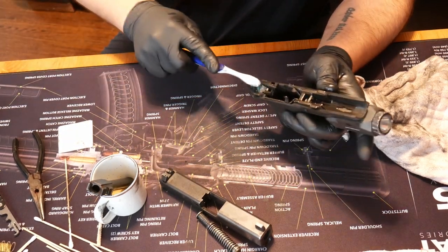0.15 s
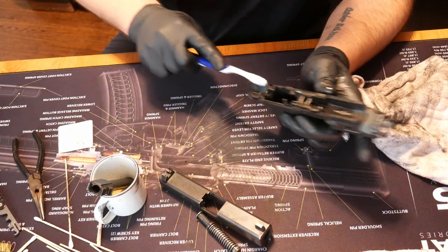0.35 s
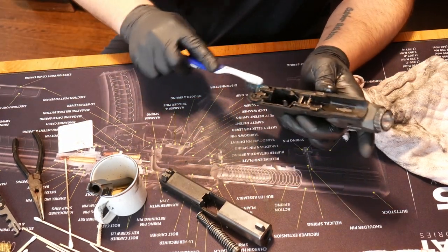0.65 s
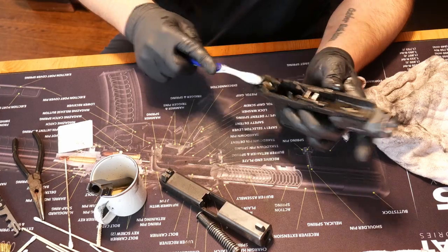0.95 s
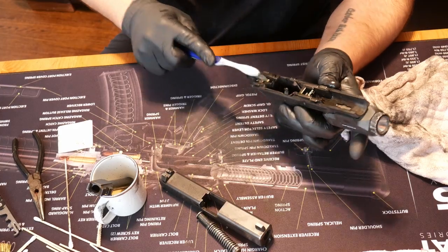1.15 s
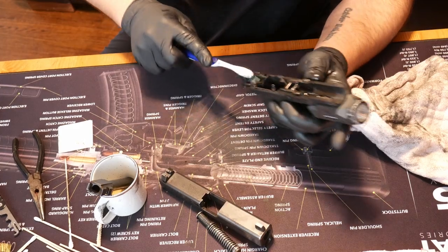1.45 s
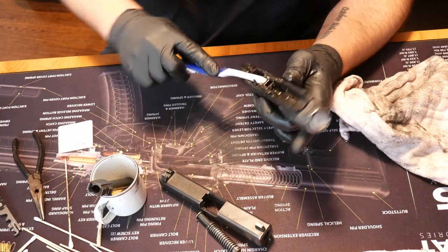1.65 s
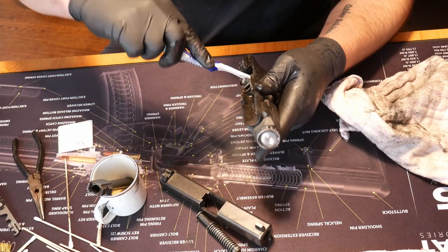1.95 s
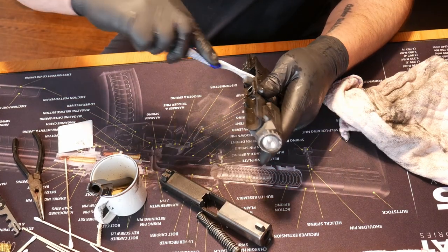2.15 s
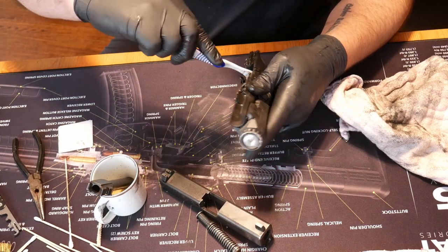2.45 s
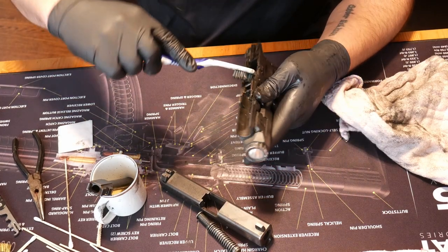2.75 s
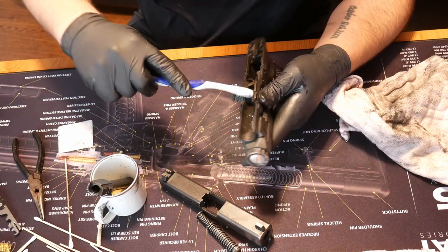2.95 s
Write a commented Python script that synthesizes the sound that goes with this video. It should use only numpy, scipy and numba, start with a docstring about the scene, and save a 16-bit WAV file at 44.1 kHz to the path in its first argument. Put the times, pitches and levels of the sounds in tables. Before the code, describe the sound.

Close, scratchy toothbrush strokes run over a wet pistol frame at a bench in a small room. A cluster of ringing knocks follows, then softer scrubbing and one sharp, bright metal snap, over a faint hum.

```python
"""A toothbrush scrubs a wet pistol frame, about eight strokes a second, over a bench in a small room.
Bristles flick off the edges, hissing and ringing the hollow frame. The frame knocks as it is turned
in the hand, then a metal part snaps sharply. The snap overloads the input: a limiter ducks and lets
the room's ring swell back. Underneath sit room tone, a wavering hum and soft thuds of hands on the bench."""
import sys
import numpy as np
from scipy import signal
from scipy.fft import rfft, irfft, next_fast_len
from scipy.io import wavfile
from scipy.ndimage import uniform_filter1d
from numba import njit

SR = 44100
rng = np.random.default_rng(int(sys.argv[2]) if len(sys.argv) > 2 else 0)


def master_out(mix):
    """Clip the mix to full scale and print it as 16-bit PCM to the path in sys.argv[1]."""
    frames = np.transpose(np.atleast_2d(mix))
    ceiling = np.clip(frames, -1, 1)
    pcm = np.round(ceiling * 32767).astype(np.int16)
    wavfile.write(sys.argv[1], SR, pcm)


N = 136710
TIME = np.arange(N) / SR
HIT_GAIN = np.sqrt(.005 * SR)  # gives a hit of energy 1 the energy of 5 ms at rms 1


def undb(db):
    """Decibels to gain."""
    return 10 ** (np.asarray(db) / 20)


def unit_rms(x):
    """Scale to rms 1."""
    return x / np.sqrt(np.mean(x ** 2))


def unit_energy(x):
    """Scale to energy 1."""
    return x / np.sqrt(np.sum(x ** 2))


def on_log(hz, points):
    """Read a curve on a log-frequency axis."""
    freqs, values = np.array(points, float).T
    return np.interp(np.log(np.maximum(hz, 1)), np.log(freqs), values)


def colour(x, eq):
    """Minimum-phase EQ: nothing rings ahead of a transient."""
    n = 2 * next_fast_len(len(x))
    cepstrum = irfft(on_log(np.fft.rfftfreq(n, 1 / SR), eq) * np.log(10) / 20)
    cepstrum[1:n // 2] *= 2
    cepstrum[n // 2 + 1:] = 0
    return irfft(rfft(x, n) * np.exp(rfft(cepstrum)))[:len(x)]


def noise(eq):
    """Steady coloured noise of rms 1."""
    return unit_rms(colour(rng.standard_normal(N), eq))


def wander(per_s):
    """Smooth random drift of rms 1."""
    hold = max(int(SR / per_s), 1)
    steps = np.repeat(rng.standard_normal(N)[:N // hold + 1], hold)
    return unit_rms(uniform_filter1d(steps, hold)[:N])


def add(out, at, x):
    """Mix a sound in at a time in seconds."""
    i = int(at * SR)
    out[i:i + len(x)] += x[:N - i]


# Room tone common to both channels (frequency [Hz], level [dB])
TONE_MID_EQ = [(25, -24), (60, -2), (130, -1.5), (300, -1), (600, -4.5), (1200, -6.5), (3000, -14.5),
               (7000, -17), (15500, -21.5)]
# Room tone opposed between the channels, for width (frequency [Hz], level [dB])
TONE_SIDE_EQ = [(25, -15), (45, 4), (65, 6), (85, 11), (105, 2), (135, 5), (190, -11.5), (400, -7),
                (1200, -11.5), (3000, -14.5), (15500, -17)]


def room_tone(hum_hz=86, waver_db=12):
    """A steady bed of air, with a wavering hum opposed between left and right."""
    mid = undb(-47.5) * noise(TONE_MID_EQ)
    side = undb(-43.5) * noise(TONE_SIDE_EQ)
    hum = np.sin(2 * np.pi * hum_hz * TIME + .5 * wander(6.4))
    side += undb(-48.5) * unit_rms(hum * undb(waver_db * wander(12)))
    return np.array([mid + side, mid - undb(-1.5) * side])


# Cues for the bench thuds (time [s], half-width [s], level [dB])
THUD_CUES = [(0.405, 0.058, -43.5), (0.535, 0.031, -47.5), (0.664, 0.042, -46.5), (0.854, 0.053, -51.5),
             (1.057, 0.076, -48), (1.392, 0.11, -49.5), (1.59, 0.028, -57), (1.694, 0.052, -47),
             (1.848, 0.069, -56)]
# Their dull, bassy tone (frequency [Hz], level [dB])
THUD_EQ = [(30, -16), (60, -10), (88, 2.5), (135, -4.5), (190, -14.5), (300, -9), (500, -23), (1200, -42)]


def bench_thuds(side_db=4.5):
    """Hands and forearms bump the bench: soft, wide swells of low noise."""
    envelope = sum(undb(db) * np.exp(-((TIME - at) / width) ** 2) for at, width, db in THUD_CUES)
    mid, side = noise(THUD_EQ), undb(side_db) * noise(THUD_EQ)
    return envelope * np.array([mid + side, mid - side]) / np.sqrt(2)


# Reverb time of the small room (frequency [Hz], t60 [s])
REVERB_DECAY = [(200, 0.18), (1500, 0.54), (3500, 0.62), (6000, 0.47), (10000, 0.31), (15000, 0.22)]


def reverb(send, build_s=.0013):
    """One channel of diffuse reflections; the upper mids outlast the bass and the top."""
    t = np.arange(SR) / SR
    hz, spectrum = np.fft.rfftfreq(SR, 1 / SR), rfft(rng.standard_normal(SR))
    tail = 0
    for band, t60 in REVERB_DECAY:
        share = on_log(hz, [(f, f == band) for f, _ in REVERB_DECAY])
        tail += irfft(spectrum * share, SR) * np.exp(-np.log(1000) * t / t60)
    tail *= 1 - np.exp(-t / build_s)
    return signal.fftconvolve(send, unit_energy(tail))[:N]


def transient(decay_s, eq, rise_s=.00064):
    """The crack of a hard contact: a noise burst of energy 1."""
    t = np.arange(SR // 8) / SR
    envelope = np.exp(-t / decay_s) * (1 - np.exp(-t / rise_s))
    burst = rng.standard_normal(len(t)) * envelope
    for _ in range(6):  # flatten the spectrum, then restore the envelope
        burst = irfft(np.exp(1j * np.angle(rfft(burst))), len(t))
        local_rms = np.sqrt(np.abs(uniform_filter1d(burst ** 2, size=24)) + 1e-12)
        burst *= envelope / local_rms
    return unit_energy(colour(burst, eq))


# Bright, metallic tone of the snap (frequency [Hz], level [dB])
SNAP_EQ = [(100, -10), (500, -10.5), (1000, -17), (1600, -8.5), (2600, -8.5), (3650, 1), (4400, -3.5),
           (6400, 0.5), (7800, -3), (11000, -1), (15500, -14.5)]
# Early reflections off the bench and nearby things (delay [s], level [dB])
SNAP_ECHOES = [(.005, -18), (.011, -31)]


def snap(at=2.6035, level_db=8.5):
    """A metal part strikes home, far louder than all else; nearby surfaces throw it back."""
    out = np.zeros(N)
    crack = undb(level_db) * HIT_GAIN * transient(decay_s=.00084, eq=SNAP_EQ)
    add(out, at, crack)
    for delay, db in SNAP_ECHOES:
        add(out, at + delay, undb(db) * crack)
    return out


def partial(hz, t60, detune_span=.025, scatter_db=3):
    """One fading mode of the frame; grip and point of contact vary its pitch and strength."""
    t = np.arange(SR // 8) / SR
    detune, strength = rng.uniform(-1.11, 1, 2)
    wave = np.sin(2 * np.pi * (hz * (1 + detune_span * detune) * t + rng.random()))
    return undb(scatter_db * strength) * unit_energy(wave * np.exp(-np.log(1000) * t / t60))


# Modes of the hand-held frame (frequency [Hz], brushed level [dB], knocked level [dB], knocked t60 [s])
FRAME_MODES = [(1470, -4.5, -6.5, 0.023), (1601, -10, -6.5, 0.038), (1904, -5.5, -8.5, .025),
               (2660, -31.5, -16, 0.0041), (2997, -12.5, -5.5, 0.033), (3170, -8, -7, 0.06),
               (3460, -0.5, -3.5, 0.02), (3680, -1, -3.5, 0.019), (4720, -12, -10.5, 0.0077),
               (6300, -4, -18, 0.0036)]


def knocked_ring(low_db, low_below_hz=2400):
    """The hollow frame rings after a blow; low_db weights its low modes."""
    return sum(undb(db + low_db * (hz < low_below_hz)) * partial(hz, t60)
               for hz, _, db, t60 in FRAME_MODES)


def brushed_ring(t60_share=.43):
    """The frame's ring after one flick, damped by the bristles pressed on it."""
    return unit_energy(sum(undb(db) * partial(hz, t60 * t60_share) for hz, db, _, t60 in FRAME_MODES))


# Cues for the knocks (time [s], level [dB], low-mode trim [dB], crack and scuff trim [dB])
KNOCK_CUES = [(0.015, -33, -18, -1), (0.029, -35, -9, -18), (0.108, -34, -1, -6), (.252, -30, -1, -11),
              (.294, -29, -19, 0.5), (.526, -30, -17, -5), (1.04, -30.5, -19, -13), (1.145, -35.5, -23, -3),
              (1.307, -27.5, -20, -11), (1.324, -31, 3, -8), (1.394, -27.5, 3.5, -7),
              (1.441, -26, -25, -12), (1.536, -16.5, -7.5, -10.5), (1.545, -24, -5.5, -17),
              (1.572, -18.5, -3.5, -2), (1.5784, -21.5, 0, -8), (1.583, -27, 2, -19), (1.619, -31, 6, -5),
              (1.678, -22, 6, 2.5), (1.7, -22, 1.5, 0.5), (1.82, -29.5, 5.5, -7.5), (1.975, -31, 0.5, -5),
              (2.193, -38, 6, -9), (2.311, -25.5, 1, -5), (2.42, -24.5, 1.5, -12.5), (2.438, -25.5, 2, -14),
              (2.444, -28, 10.5, 3.5), (2.566, -30, -5, 8), (2.581, -30.5, 6, -4), (2.5975, -28.5, 3, 9),
              (2.6005, -22, 7.5, 3.5), (2.952, -31, 8.5, 3), (2.9724, -27.5, 12.5, 7), (3.059, -39, 8, 6)]
# Bite of the crack and scuff (frequency [Hz], level [dB])
CRACK_EQ = [(80, -19), (300, -8), (700, -0.5), (1400, -4), (2400, -3), (3600, 8.5), (5500, 1.5),
            (8000, -3.5), (10500, -3.5), (15500, -16.5)]


def knocks(scuff_s=.003, scuff_db=-14):
    """Brush head and fingers hit the frame: a crack and a ring, with a brief rub around each contact."""
    hits, scuff = np.zeros(N), 0
    for at, db, low_db, crack_db in KNOCK_CUES:
        ring = undb(-8) * knocked_ring(low_db)
        crack = undb(crack_db - 3.5) * transient(decay_s=.0021, eq=CRACK_EQ)
        add(hits, at, undb(db) * HIT_GAIN * (ring + crack))
        scuff += undb(db + crack_db + scuff_db) * np.exp(-np.abs(TIME - at) / scuff_s)
    return hits + scuff * noise(CRACK_EQ)


def bristles(flicks_per_s=9000, spread_db=2, judder_db=1.96, judder_per_s=130):
    """A fine grain of bristle flicks of uneven size, roughened by the judder of the tufts."""
    flicks = (rng.random(N) < flicks_per_s / SR) * rng.choice([-1, 1], N)
    sizes = undb(spread_db * np.minimum(rng.exponential(size=N), 5))
    judder = undb(judder_db * wander(judder_per_s))
    return unit_rms(flicks * sizes * judder)


# Cues for the strokes (time of fastest travel [s], rise [s], fall [s], level [dB], ring trim [dB])
STROKE_CUES = [(0.022, 0.029, 0.031, -35, 3), (.128, 0.038, 0.04, -31, -5), (0.276, 0.047, 0.037, -35, 0),
               (0.366, 0.03, 0.051, -32.5, -1), (.517, .04, 0.041, -37, 1.5),
               (.635, 0.064, 0.048, -38.5, -2), (.782, 0.065, 0.038, -39.5, 0.5),
               (.888, .03, 0.056, -37, -3), (1.04, 0.073, 0.035, -38.5, -6),
               (1.152, 0.058, 0.061, -39.5, -5.5), (1.31, 0.058, 0.048, -36.5, -4),
               (1.424, 0.047, 0.033, -32, -1.5), (1.56, 0.045, 0.038, -32.5, 0),
               (1.645, 0.025, 0.071, -48.5, 5), (1.8, 0.057, 0.092, -50, 5.5),
               (1.96, 0.086, 0.11, -49.5, 1), (2.07, 0.057, 0.04, -42.5, -7), (2.28, 0.13, 0.1, -52, 3.5),
               (2.439, 0.032, 0.048, -45.5, 8.5), (2.588, 0.033, 0.01, -38, 8.5),
               (2.95, 0.045, 0.037, -43, 0.5), (3.05, 0.069, 0.081, -46, 0.5)]
# Bright hiss of the bristles (frequency [Hz], level [dB])
HISS_EQ = [(100, -13.5), (500, -12.5), (1100, -16), (2500, -2), (4500, -0.5), (6200, -2), (7600, -2),
           (9300, 2.5), (11000, 0.5), (12300, -7), (15500, -6.5)]


def toothbrush(resting_db=-57, ring_db=-1, low_cut_hz=1230):
    """Each stroke swells and fades with brush speed; the flicks hiss and set the frame ringing."""
    flicks = bristles()
    kicks = flicks * rng.choice([-1, 1], N)  # fresh signs decorrelate the ring from the hiss
    hiss_power, ring = undb(resting_db) ** 2, 0
    for at, rise, fall, db, trim_db in STROKE_CUES:
        width = np.where(TIME < at, rise, fall)
        swell = undb(db) * np.exp(-((TIME - at) / width) ** 2)
        hiss_power += swell ** 2
        ring += signal.fftconvolve(kicks * swell * undb(trim_db), brushed_ring())[:N]
    hiss = unit_rms(colour(flicks, HISS_EQ)) * np.sqrt(hiss_power)
    # the small frame radiates little low end
    low_cut = signal.butter(2, low_cut_hz, "highpass", fs=SR, output="sos")
    return hiss + undb(ring_db) * signal.sosfilt(low_cut, ring)


# Reverb send of the knocks (frequency [Hz], gain [dB])
KNOCK_SEND_EQ = [(300, -2.5), (1600, -1.5), (2500, 1.5), (3600, -10.5), (6000, -2.5), (12000, -7)]
# Reverb send of the snap (frequency [Hz], gain [dB])
SNAP_SEND_EQ = [(200, -26), (600, -19.5), (1500, -7.5), (3500, -10), (5000, -8.5), (6100, -6.5),
                (8000, -10), (11000, -13), (15000, -14)]


def scene(brush_send_db=-4, reverb_side_db=-2.5):
    """Brush, knocks and snap dead centre, with the room spread around them."""
    scrub, taps, click = toothbrush(), knocks(), snap()
    send = undb(brush_send_db) * scrub + colour(taps, KNOCK_SEND_EQ) + colour(click, SNAP_SEND_EQ)
    mid, side = reverb(send), undb(reverb_side_db) * reverb(send)
    room = np.array([mid + side, mid - side]) / np.sqrt(2)
    return scrub + taps + click + room + bench_thuds() + room_tone()


@njit
def duck(over_db, attack_s, release_db_per_s):
    """Gain reduction in dB: rises quickly to the overshoot, falls back at a steady rate."""
    attack = 1 - np.exp(-1 / (attack_s * SR))
    out, cut = np.empty(len(over_db)), 0.
    for i, over in enumerate(over_db):
        if over > cut:
            cut += (over - cut) * attack
        else:
            cut = max(cut - release_db_per_s / SR, 0.)
        out[i] = cut
    return out


def record(dry, threshold_db=-2, skew=.13, high_cut_hz=15450):
    """A limiter ducks on the snap, whose first instant clips unevenly; the very top is cut."""
    over_db = 20 * np.log10(np.abs(dry).max(axis=0) + 1e-9) - threshold_db
    limited = dry * undb(-duck(over_db, attack_s=.00045, release_db_per_s=71.5))
    # overload bends one half-wave more than the other, adding a low thump
    overload = np.maximum(np.abs(limited) - 1, 0)
    thump = skew * uniform_filter1d(overload, size=40, axis=1)
    high_cut = signal.ellip(8, .2, 70, high_cut_hz, fs=SR, output="sos")
    return signal.sosfilt(high_cut, np.clip(limited - thump, -1, 1))


dry = scene()
out = record(dry)
master_out(out)
```